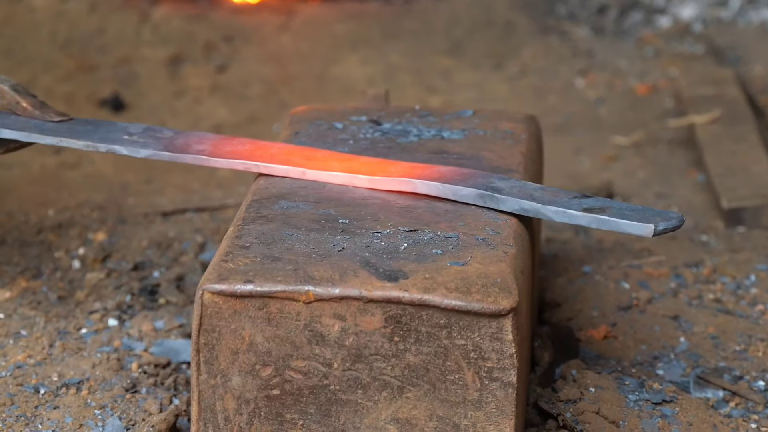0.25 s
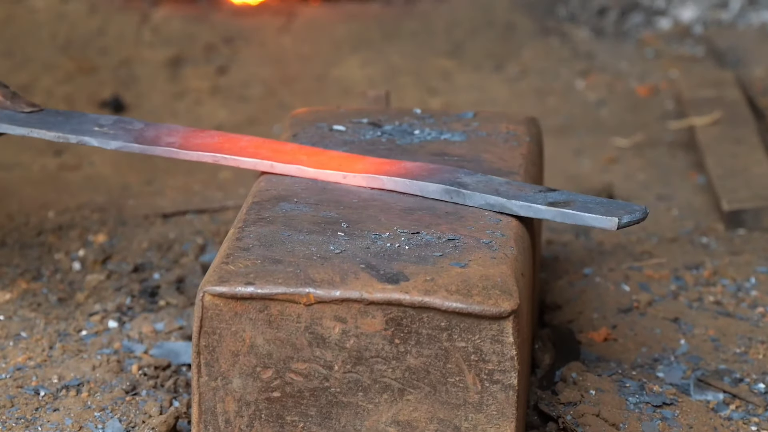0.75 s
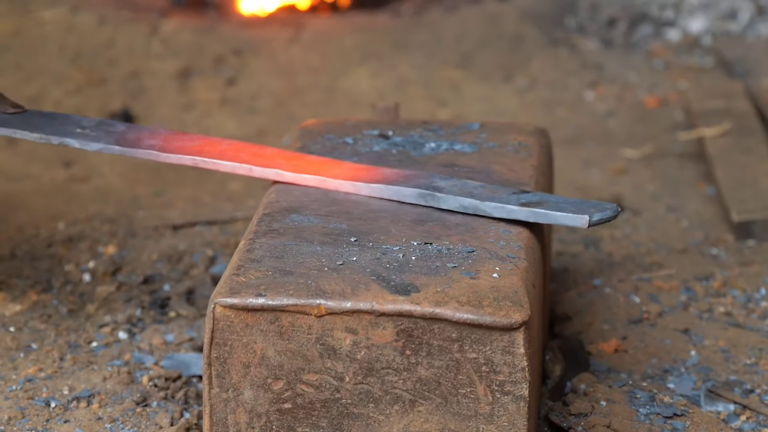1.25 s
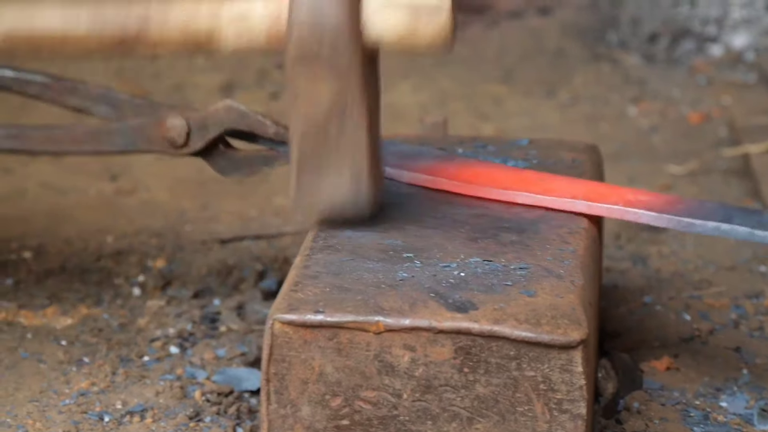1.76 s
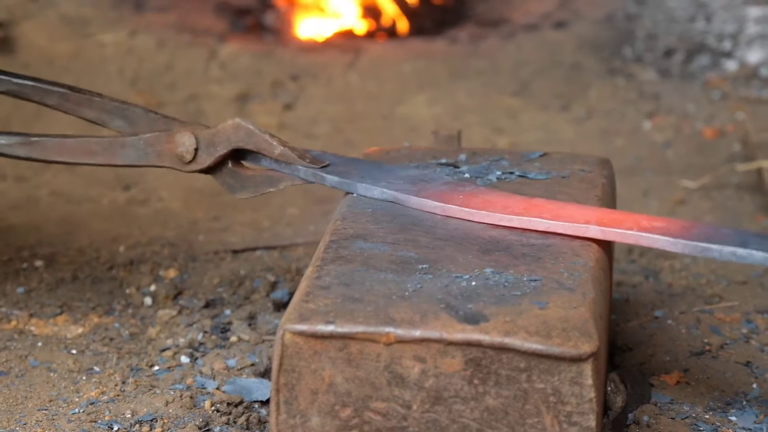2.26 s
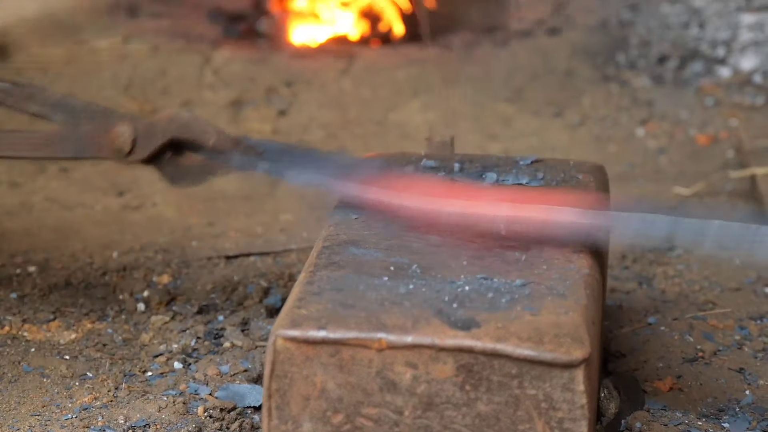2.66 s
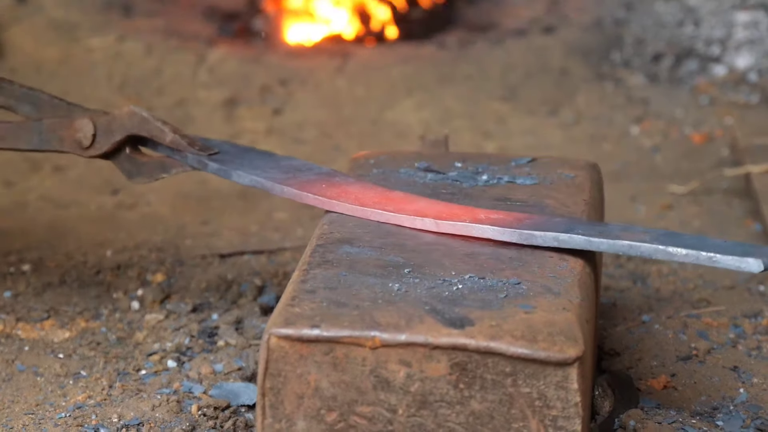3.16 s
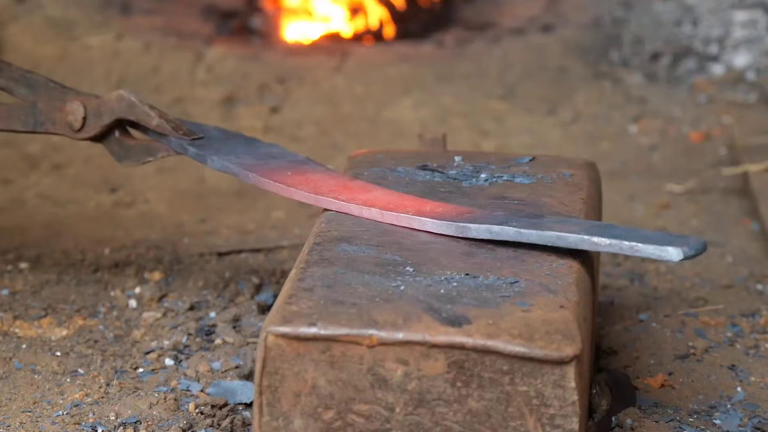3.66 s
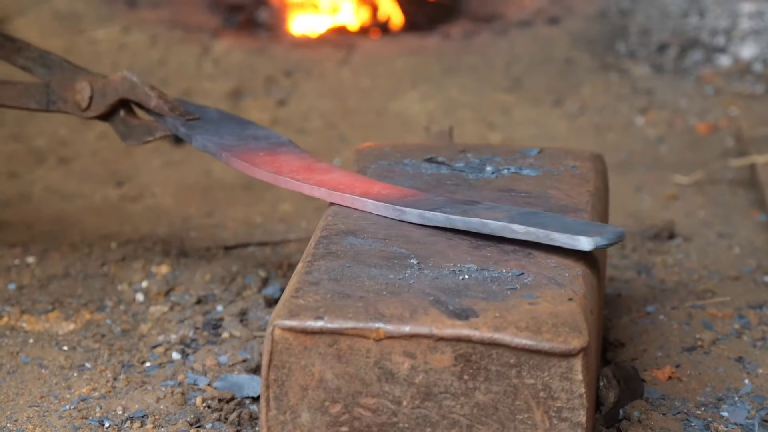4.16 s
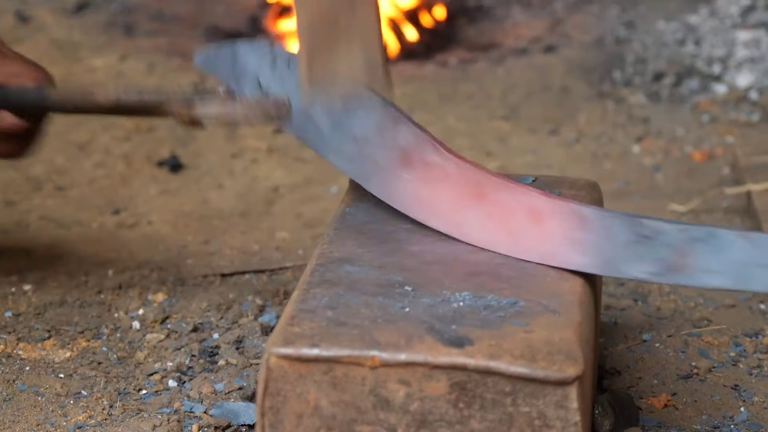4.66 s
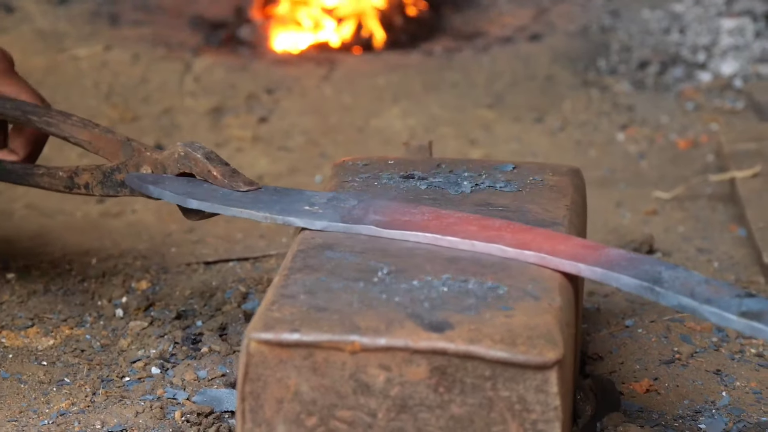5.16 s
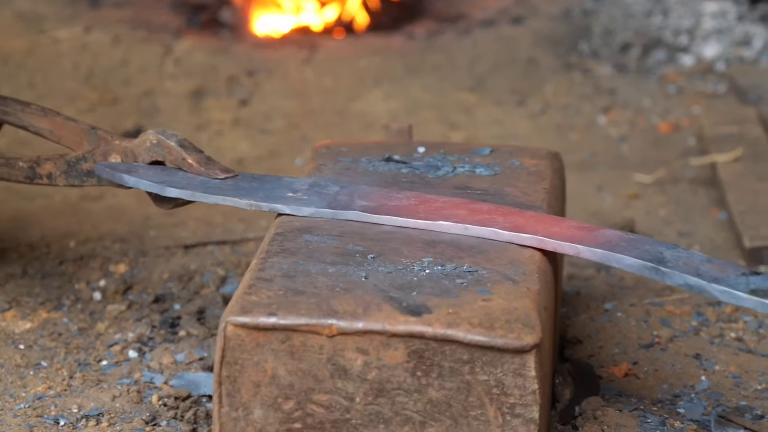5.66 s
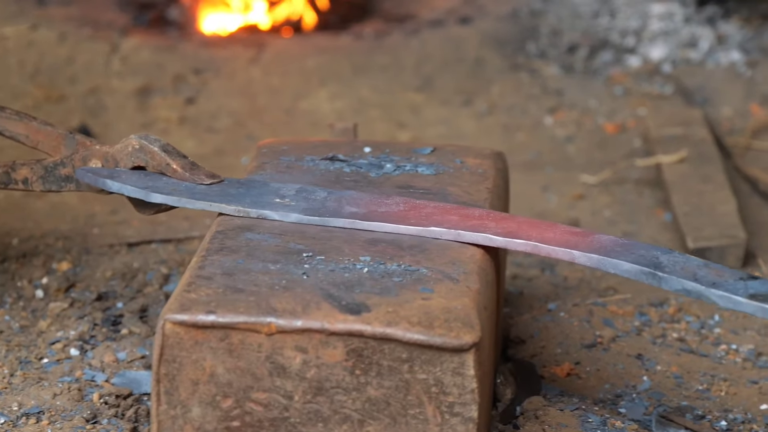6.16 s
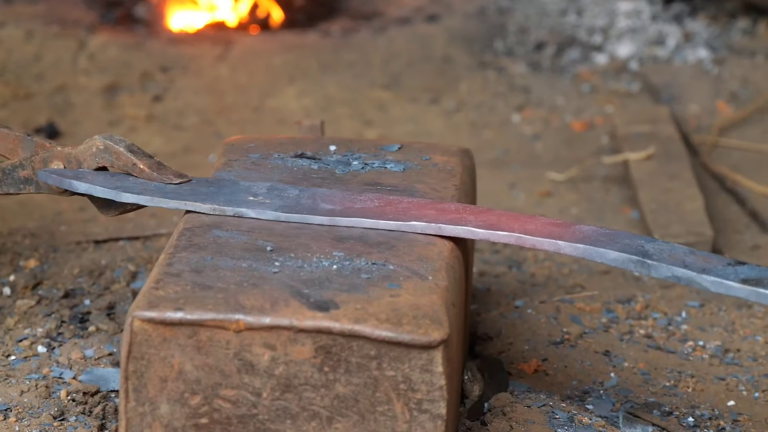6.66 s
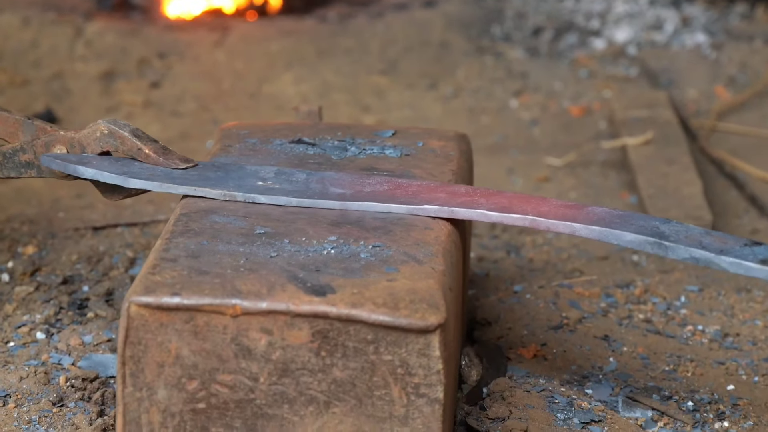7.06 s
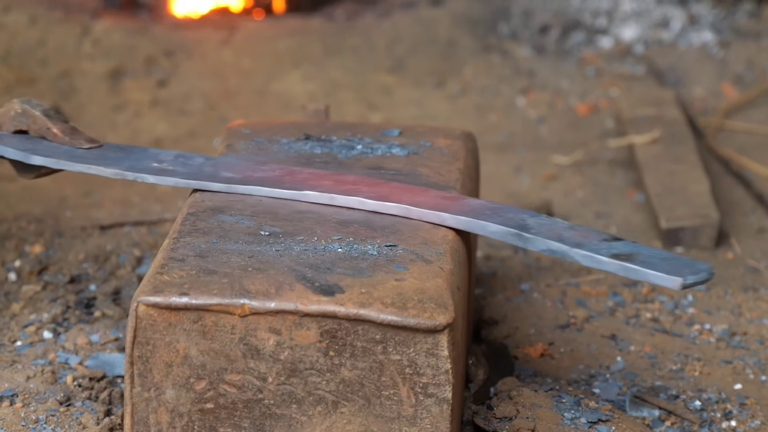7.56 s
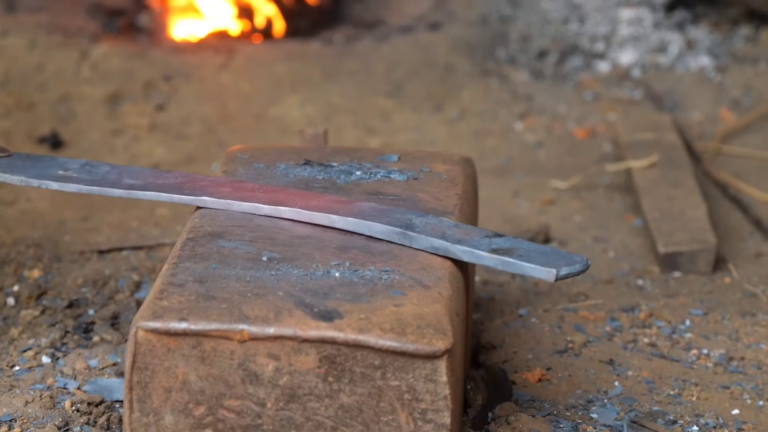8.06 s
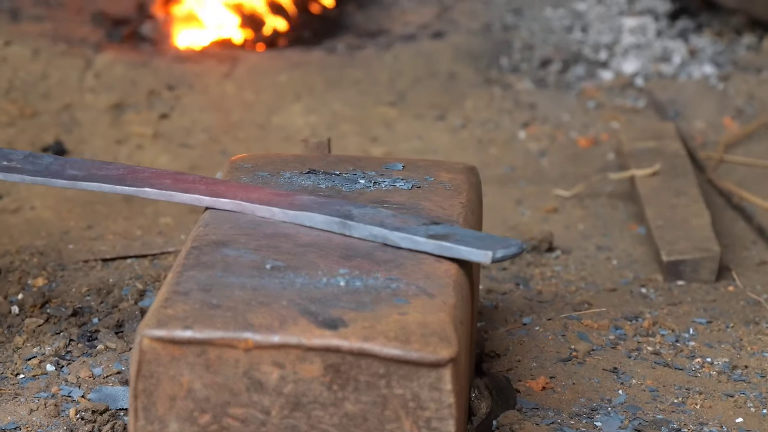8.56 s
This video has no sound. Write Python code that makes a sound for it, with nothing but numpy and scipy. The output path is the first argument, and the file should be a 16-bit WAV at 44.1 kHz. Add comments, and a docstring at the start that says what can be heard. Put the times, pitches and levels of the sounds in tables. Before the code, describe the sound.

Steady hammer blows crack and ping on a steel blade and anvil, with light clinks between and a faint fire rumbling behind.

```python
"""A hand hammer strikes a hot steel blade on an anvil block under an open shed roof.
Each blow cracks in the damped blade, thuds in the ground and leaves the hammer head and anvil ringing;
the roof throws it back. Hammer, blade and tongs tap between blows, among soft swells of hiss.
Behind, a forge fire rumbles and hisses beside a low hum, perhaps a blower, and a faint high chirr.
A compressor ducks every blow."""
import sys
import numpy as np
from scipy import signal
from scipy.fft import rfft, irfft, next_fast_len
from scipy.io import wavfile
from scipy.ndimage import uniform_filter1d

SR = 44100
rng = np.random.default_rng(int(sys.argv[2]) if len(sys.argv) > 2 else 0)


def pcm_store(signal):
    """Save signal as 16-bit PCM."""
    levels = np.round(np.clip(np.atleast_2d(signal), -1, 1) * 32767)
    wavfile.write(sys.argv[1], SR, levels.astype(np.int16).T)


N = 388961
LEAD = 4096   # samples of run-in: a blow lands right at the start
SIZE = next_fast_len(N + 2 * LEAD)
HZ = np.maximum(np.arange(SIZE // 2 + 1) * SR / SIZE, 1)


# Hammer blows. Each row: start in seconds, crack peak in dB, brightness in dB per octave,
# then thud, head ring, upper ring, off-centre ring and extra echo, all in dB.
BLOWS = [(-0.001, 3, -1, -15, -18.5, -8.5, 2, 0.5), (0.4513, 13.5, -1.5, -9, -18.5, -12.5, 2, 2),
         (0.9156, 8, 0.5, -12, -19, -11, 0.5, 0.5), (1.366, 8.5, 1, -9.5, -16, -22.5, -9.5, 2),
         (2.306, 11, 0.5, -12, -21, -4.5, 7.5, -2.5), (2.7345, 13, -1, -15.5, -15.5, -8.5, -1, -0.5),
         (3.1791, 11.5, -0.5, -11, -15.5, -12, -5, 1), (3.6425, 9, 0.5, -12, -20.5, -22.5, -5.5, -1),
         (4.085, -10.5, 1.5, -18, -42.5, -4.5, 1.5, 1.5), (4.517, 1.5, 2, -30, -27.5, -33.5, -11, 1.5),
         (5.227, 11.5, 0.5, -7, -19, -8.5, 5.5, -4.5), (5.6548, 14.5, 0, -5.5, -15, -23, -5, -2),
         (6.0823, 11.5, -0.5, 0, -16.5, -12.5, 6, 1), (6.5296, 10.5, -2, -0.5, -11.5, -20, -1.5, 2.5),
         (6.968, 0, 0, -47.5, -14.5, -13, 3.5, 3), (7.4007, 9, 1, -9, -9.5, -14, -8, .5),
         (7.8099, 12, 0.5, -12, -12.5, -24.5, -7, 0), (8.252, 6.5, 1.5, -17.5, -19, -28, -9.5, -1.5),
         (8.684, 8, 1, -5, -30.5, -19, -2, -1)]
# Light taps of hammer, blade and tongs on the anvil. Each row: start in seconds, peak in dB,
# brightness in dB per octave, echo send in dB.
TAPS = [(1.557, -30.5, -5, 13.5), (1.597, -14.5, -4.5, 7.5), (1.635, -22, -6.5, 9.5), (1.801, -37, 1, 21),
        (1.942, -57.5, 4.5, 17), (1.99, -49.5, 1, 7), (4.136, -36.5, 3, 28), (4.68, -15.5, -2, 17.5),
        (4.692, 0.5, -4, 2.5), (4.904, -38, -1, 16.5)]

def contact_rows():
    """Blows and taps in one cue list, laid out like TAPS; quieter blows get more echo send."""
    blows = [(s, peak_db, tilt_db, 11.5 - 0.46 * peak_db + extra_db)
             for s, peak_db, tilt_db, *_, extra_db in BLOWS]
    return np.array(blows + list(TAPS))


# Hot blade pinched on the anvil. Each row: pitch in Hz, level in dB, ring time (t60) in seconds.
BLADE_MODES = [(650, -15, 0.0028), (1363, -8.5, 0.02), (1502, -4, 0.0069), (1913, -12.5, 0.014),
               (2083, -14, 0.0098), (3037, 3.5, 0.0074), (3450, -4, 0.011), (4210, 8, 0.0018),
               (5298, 2.5, 0.0027), (6410, -4, 0.006), (7230, -6.5, 0.0047), (8400, -4, 0.0027),
               (9630, -6.5, 0.0075), (10827, -16, 0.024), (13300, -31, 0.0022)]

def blade_crack(peak_db, tilt_db, luck, contact_s=0.0025):
    """One hard click and a moment of uneven contact drive the blade modes, each at its own strength."""
    t = np.arange(LEAD) / SR
    chatter = .1 * np.resize(luck, LEAD) * (t < contact_s)
    chatter[20:23] += [.3, .5, .3]   # the faces meet fully after half a millisecond
    crack = 0
    for k, (hz, db, t60) in enumerate(BLADE_MODES):
        mode_db = db + tilt_db * np.log2(hz / 3000) + 2 * luck[-1 - k]
        crack += (-1) ** k * from_db(mode_db) * ring(chatter, hz, t60)
    crack = butter(crack, 530, "high")   # the crack holds no deep bass
    return from_db(peak_db) * crack / np.abs(crack).max()


# Slaps off the roof and posts. Each row: delay in seconds, level in dB.
SLAPS = [(.0092, -15.5), (0.015, -19), (0.0244, -31.5)]

def cracks_and_echoes(smear_s=0.001):
    """Every contact cracks in the blade; rough surfaces throw it back dull and blurred."""
    rows = contact_rows()
    direct, echoes = np.zeros((2, SIZE))
    smear = np.exp(-np.arange(512) / (smear_s * SR))
    for (s, peak_db, tilt_db, echo_db), luck in zip(rows, rng.standard_normal((len(rows), 4, 512))):
        crack = blade_crack(peak_db, tilt_db, luck[0])
        direct[sample(s):sample(s) + LEAD] += crack
        for (lag, db), blur in zip(SLAPS, luck[1:] * smear):
            slap = np.convolve(crack, blur / np.linalg.norm(blur))[:LEAD]
            echoes[sample(s + lag):sample(s + lag) + LEAD] += from_db(echo_db + db) * slap
    return direct, butter(echoes, 2800, "low")


# The hammer head's ping. Each row: pitch in Hz, level in dB, ring time in seconds,
# share of the blow's upper ring, share of its off-centre ring.
HEAD_MODES = [(5039, -19.5, 0.39, 0.17, .8), (5101, 2, 0.19, 0, 0.05), (5125, 2.5, 0.19, 0, 1.4),
              (8536, -2.5, 0.4, 1, 0.05), (9685, -12.5, 0.26, 0.24, 0.8), (14200, -29.5, .15, .1, -.3)]

def hammer_head(lift_share=0.87, wobble_db=2.5, damp_after_s=0.219, damp_db_per_s=116):
    """Muffled on the steel, the ring swells as the head lifts, wobbles as it turns, and is damped by the hand
    soon after."""
    ring_db, upper_db, off_db = np.array(BLOWS)[:, 4:7].T
    luck = rng.standard_normal((len(BLOWS), len(HEAD_MODES)))
    ping = 0
    for k, (hz, db, t60, upper, off) in enumerate(HEAD_MODES):
        clicks = blow_clicks(ring_db + db + upper * upper_db + off * off_db + 3.5 * luck[:, k])
        muffled = ring(clicks, hz, t60 / (1 + 1 / lift_share))   # muffling clears in lift_share * t60
        ping += from_db(wobble_db * drift(15)) * (ring(clicks, hz, t60) - muffled)
    last_blow = np.maximum.accumulate(np.arange(SIZE) * (clicks != 0))
    since_s = (np.arange(SIZE) - last_blow) / SR
    return ping * from_db(-damp_db_per_s * np.maximum(since_s - damp_after_s, 0))


# The block on the ground. Each row: pitch in Hz, level in dB, ring time in seconds.
THUD_MODES = [(106, -16.5, 0.067), (222, -9, 0.033), (335, -4, 0.009)]

def ground_thud():
    """Each blow drives the anvil block into the ground."""
    thud_db = np.array(BLOWS)[:, 3]
    thud = sum(ring(blow_clicks(thud_db + db), hz, t60) for hz, db, t60 in THUD_MODES)
    return butter(thud, 140, "high")   # the thud holds no deep bass


# The steel's tail. Each row: pitch in Hz, level in dB on top of peak and send, ring time in seconds.
ANVIL_MODES = [(565, -40, .05), (709, -36, .07), (1282, -40, .045), (1500, -41, .045), (1835, -40, .07),
               (3300, -40, .11), (4016, -48, .09), (4860, -47, .09), (6550, -52, .06), (10845, -42, .14),
               (11400, -46, .06), (13250, -48, .05)]

def anvil_ring():
    """The anvil and the blade's cooler end ring on; each contact strikes the modes differently."""
    s, peak_db, tilt_db, echo_db = contact_rows().T
    luck = rng.standard_normal((len(s), len(ANVIL_MODES)))
    tail = 0
    for k, (hz, db, t60) in enumerate(ANVIL_MODES):
        mode_db = peak_db + echo_db + db + tilt_db * np.log2(max(hz, 800) / 3000) + 3 * luck[:, k]
        tail += ring(clicks_at(s, mode_db), hz, t60)
    return tail


# Small hits. Each row: start in seconds, pitch in Hz, level in dB, ring time in seconds.
CLINKS = [(0.612, 288, -43, 0.18), (0.616, 430, -50, 0.13), (1.596, 4470, -37, 0.081),
          (1.597, 5125, -33, .15), (1.637, 4470, -22, 0.05), (1.638, 10800, -32.5, 0.053),
          (1.947, 2430, -55.5, 0.098), (4.692, 5039, -16, 0.29), (4.692, 5101, -14, 0.15),
          (4.692, 8536, -45.5, 0.48), (4.691, 9685, -44.5, 0.24), (4.681, 10730, -37, 0.17)]

def clinks():
    """A dull knock nearby and clinks of tongs, blade and resting hammer, all dying sines."""
    return sum(ring(clicks_at(s, db), hz, t60) for s, hz, db, t60 in CLINKS)


# Reverb decay. Each row: frequency in Hz, ring time in seconds.
SHED_T60 = [(100, 0.27), (400, 0.12), (1500, 0.14), (4000, 0.076), (8000, 0.091), (14000, 0.13)]
# Reverb tone and width. Each row: frequency in Hz, gain in dB (for width, side against mid).
SHED_EQ = [(150, -21), (350, -16.5), (700, -6.5), (1000, -12.5), (1500, -4), (2200, -8), (3200, -1),
           (4500, 1), (6500, -10.5), (10000, -10.5), (11600, -22), (12800, -40.5)]
SHED_WIDTH = [(60, -6.5), (600, -7), (2000, -5), (3600, -11), (6500, -18.5), (12000, -9.5)]

def shed_reverb(rise_s=0.002, yard_db=-32.5, yard_t60=0.37):
    """Scatter under the roof builds fast and dies band by band; returns mid and side spectra."""
    s, peak_db, tilt_db, echo_db = contact_rows().T
    edges_hz = 255 * 2 ** np.arange(0, 6.1, .5)
    white = rng.standard_normal((2, 2, SIZE))
    rise, yard_fall = np.exp(-1 / (rise_s * SR)), from_db(-60 / (yard_t60 * SR))
    scatter = 0
    for k, (low, high) in enumerate(zip(edges_hz, edges_hz[1:])):
        hz = np.sqrt(low * high)
        send_db = peak_db + echo_db - 19 + tilt_db * np.log2(max(hz, 800) / 3000)
        clicks = clicks_at(s, send_db) + 1e-18
        fall = from_db(-60 / (at_hz(SHED_T60, hz) * SR))
        bloom = signal.lfilter([0, fall - rise], np.convolve([1, -fall], [1, -rise]), clicks)
        yard = from_db(yard_db) * signal.lfilter([1], [1, -yard_fall], clicks)   # faint, longer answer
        scatter += (bloom + yard) * butter(white[k % 2], [low, high], "band", order=1)
    tone_db = at_hz(SHED_EQ, HZ)
    return rfft(scatter) * from_db([tone_db, tone_db + at_hz(SHED_WIDTH, HZ)])


# Swell cues. Each row: centre in seconds, length in seconds, level in dB.
HISS_SWELLS = [(.2, 0.053, -65), (.89, 0.095, -63), (1.33, 0.095, -64.5), (1.96, 0.032, -64.5),
               (2.17, 0.17, -63), (2.66, 0.22, -67), (3.09, 0.29, -68), (3.6, 0.22, -64.5),
               (4.03, 0.16, -67.5), (4.44, 0.13, -67.5), (4.93, 0.077, -55), (5.03, 0.092, -70),
               (5.11, 0.038, -70.5), (5.94, 0.36, -65), (6.055, .05, -63.5), (6.93, 0.092, -75.5),
               (7.685, 0.033, -73.5), (8.19, 0.043, -74)]
# Swell tone. Each row: frequency in Hz, gain in dB.
SWELL_EQ = [(300, -25.5), (1500, -7.5), (4000, -5), (9500, -10.5), (11500, -15.5), (15500, -46)]

def hiss_swells():
    """Soft swells of hiss, many just before a blow."""
    return swells(HISS_SWELLS) * wide_noise(SWELL_EQ)


# Fader rides for the fire's two layers. Each row: time in seconds, level in dB.
RUMBLE_RIDE = [(0.0, -63), (0.61, -58.5), (1.37, -63.5), (1.84, -64), (3.63, -63.5), (3.81, -67.5),
               (4.76, -65.5), (6.14, -63.5), (6.31, -67), (7.07, -65), (7.25, -70.5), (7.71, -66),
               (8.01, -68.5), (8.82, -66.5)]
HISS_RIDE = [(0, -62.5), (1.1, -73.5), (1.6, -63), (2.3, -71), (3.5, -73), (4.2, -76.5), (5.0, -70),
             (5.8, -71), (6.4, -77), (7.4, -82.5), (8.0, -78.5), (8.82, -80.5)]
# Rumble and hiss tone. Each row: frequency in Hz, gain in dB.
RUMBLE_EQ = [(15, -24.5), (25, 4), (65, 0), (165, 4), (340, -2.5), (480, -12), (900, -15), (2000, -23),
             (8000, -60.5)]
HISS_EQ = [(100, -31), (600, -0.5), (1100, -3), (5000, -9.5), (7800, -13.5), (9800, -13), (12100, -21),
           (15500, -46.5)]

def forge_fire():
    """The fire gives a lumpy rumble and a smoother hiss."""
    rumble = from_db(ride(RUMBLE_RIDE) + 2.3 * drift(13)) * wide_noise(RUMBLE_EQ)
    hiss = from_db(ride(HISS_RIDE) + 1.4 * drift(23)) * wide_noise(HISS_EQ)
    return rumble + hiss


# Fader ride for the hum. Each row: time in seconds, level in dB.
HUM_RIDE = [(0, -78), (1.4, -77), (1.7, -65), (2.3, -62), (2.8, -68), (3.2, -76), (3.5, -82), (8.82, -94)]

def low_hum(hz=188, width_hz=6):
    """A low wavering hum of narrow-band noise, perhaps a blower."""
    t60 = np.log(1000) / (np.pi * width_hz)
    return from_db(ride(HUM_RIDE)) * rms_one(ring(rng.standard_normal(SIZE), hz, t60))


# Chirr cues. Each row: centre in seconds, length in seconds, level in dB.
CHIRRS = [(.42, 0.095, -82), (.8, 0.06, -75.5), (1.14, 0.077, -75.5), (2.24, .12, -77.5), (5.16, .1, -78.5),
          (6.78, .12, -80.5), (7.2, 0.11, -83), (8.6, 0.11, -82)]
# Chirr tone. Each row: frequency in Hz, gain in dB.
CHIRR_EQ = [(5600, -42.5), (6300, -2.5), (6550, -1), (6800, -5), (7600, -39)]

def chirrs():
    """Faint puffs of high, narrow noise, perhaps an insect."""
    return swells(CHIRRS) * wide_noise(CHIRR_EQ)


# Width of the noise layers. Each row: frequency in Hz, side against mid in dB.
NOISE_WIDTH = [(60, -7.5), (190, -10), (350, -5), (620, -1.5), (2000, -5), (6500, -13.5), (12000, -10)]

def wide_noise(eq):
    """Stereo noise of the given tone, at rms 1."""
    mid, side = rfft(rng.standard_normal((2, SIZE))) * from_db(at_hz(eq, HZ))
    side = side * from_db(at_hz(NOISE_WIDTH, HZ))
    return rms_one(irfft(np.array([mid + side, mid - side]), SIZE))


def from_db(db):
    return 10 ** (np.asarray(db) / 20)


def rms_one(x):
    return x / np.sqrt(np.mean(x ** 2) + 1e-20)


def at_hz(points, hz):
    points_hz, values = np.transpose(points)
    return np.interp(np.log(hz), np.log(points_hz), values)


def ride(points):
    s, db = np.transpose(points)
    return np.interp((np.arange(SIZE) - LEAD) / SR, s, db)


def sample(s):
    return np.round(np.asarray(s) * SR).astype(int) + LEAD


def butter(x, hz, kind, order=2):
    return signal.sosfilt(signal.butter(order, hz, kind, fs=SR, output="sos"), x)


def clicks_at(s, db, polarity=1):
    clicks = np.zeros(SIZE)
    clicks[sample(s)] = from_db(db) * polarity
    return clicks


def blow_clicks(db):
    """One click for every blow, with random polarity."""
    return clicks_at(np.array(BLOWS)[:, 0], db, rng.choice([-1, 1], len(BLOWS)))


def ring(x, hz, t60):
    """A resonator: a unit click sets a sine of height 1 ringing."""
    r, w = from_db(-60 / (t60 * SR)), 2 * np.pi * hz / SR
    return signal.lfilter([0, np.sin(w)], [1, -2 * r * np.cos(w), r * r], x + 1e-18)


def drift(rate_hz):
    """Slow random movement at rms 1."""
    r = np.exp(-80 * np.pi * rate_hz / SR)   # one step every 40 samples
    slow = signal.lfilter([1], [1, -2 * r, r * r], rng.standard_normal(SIZE // 40 + 2002))[2000:]
    return np.interp(np.arange(SIZE) / 40, np.arange(len(slow)), rms_one(slow))


def swells(cues):
    """Smooth humps of level."""
    t = (np.arange(SIZE) - LEAD) / SR
    return sum(from_db(db) * np.cos(np.pi * np.clip((t - s) / length, -.5, .5))
               for s, length, db in cues)


def compressor(x, threshold_db=-43.5, ratio=1.41, attack_s=0.0015, release_db_per_s=186.5):
    """Looks ahead, ducks by part of the excess over the threshold and recovers at a steady rate."""
    level_db = 20 * np.log10(np.abs(x).max(axis=0) + 1e-9)
    duck_db = np.maximum(level_db - threshold_db, 0) * (1 - 1 / ratio)
    ramp = release_db_per_s * np.arange(x.shape[1]) / SR
    held_db = np.maximum.accumulate(duck_db + ramp) - ramp
    span = round(attack_s * SR)
    return x * from_db(-uniform_filter1d(np.roll(held_db, -span), size=span))


# Width of the close hits. Each row: frequency in Hz, side against mid in dB.
NEAR_WIDTH = [(60, -5.5), (350, 1), (1100, -5), (2000, -11), (3600, -17), (6500, -23), (12000, -11)]
# Phase turn from two close microphone ports. Each row: frequency in Hz, side phase in radians.
NEAR_PHASE = [(60, -1.8), (250, -1.95), (600, -1.75), (900, -1.52), (8000, -1.5)]

def scene():
    """Hits up front, the shed around them and the fire behind, all through the compressor."""
    cracks, echoes = cracks_and_echoes()
    near = rfft(cracks + ground_thud() + hammer_head() + anvil_ring() + clinks())
    mid, side = shed_reverb()
    mid += near + rfft(echoes)
    side += near * from_db(at_hz(NEAR_WIDTH, HZ)) * np.exp(1j * at_hz(NEAR_PHASE, HZ))
    hammering = irfft(np.array([mid + side, mid - side]), SIZE)
    mix = hammering + low_hum() + forge_fire() + hiss_swells() + chirrs()
    return compressor(mix)[:, LEAD:LEAD + N]


def record(dry):
    """Deep bass and high treble roll off; a steep filter cuts the very top."""
    x = butter(dry, [70, 10900], "band")
    return signal.sosfilt(signal.cheby2(12, 70, 15800, fs=SR, output="sos"), x)


dry = scene()
out = record(dry)
pcm_store(out)
```